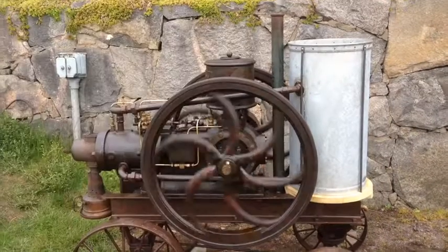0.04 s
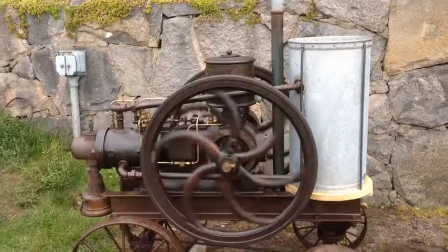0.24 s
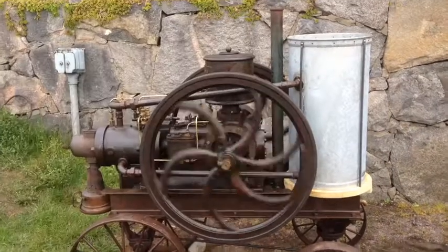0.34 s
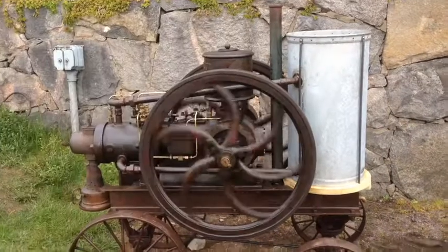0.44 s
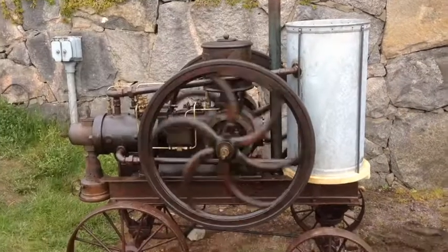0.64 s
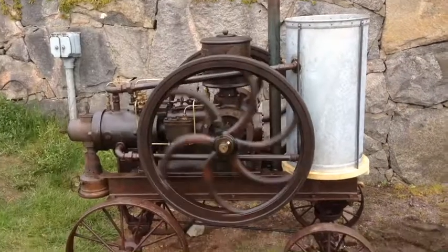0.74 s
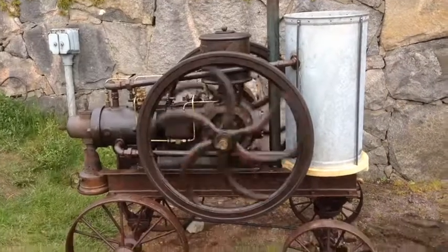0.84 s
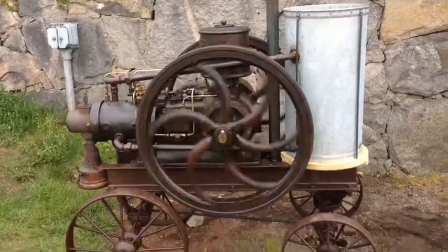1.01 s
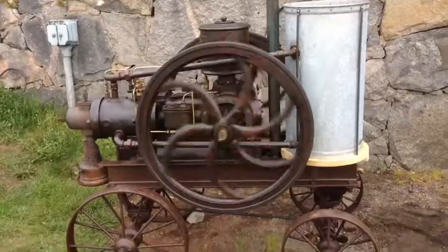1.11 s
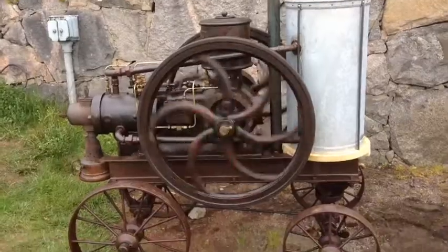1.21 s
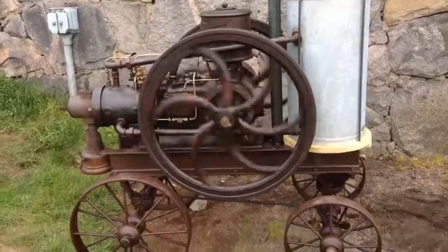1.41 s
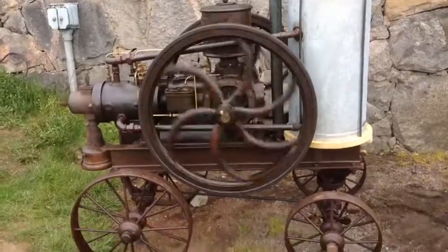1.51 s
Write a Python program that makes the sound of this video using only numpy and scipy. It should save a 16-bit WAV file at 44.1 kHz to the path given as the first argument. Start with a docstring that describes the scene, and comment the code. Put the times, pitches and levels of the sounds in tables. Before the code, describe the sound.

An old engine runs with rhythmic puffs, metal clacks and irregular booming exhaust firings.

```python
"""A chugging, clacking beat, about four to the second: an old single-cylinder two-stroke engine outdoors.
It fires on only some turns. A firing booms and hisses out of the exhaust stack; an unfired turn only puffs.
Each turn it gulps air (a thump, a fluttering valve, a hiss), its linkage clacks and its exhaust port
opens with a crack. The iron frame rumbles underneath, and a stone wall throws back a short scatter."""
import sys
import numpy as np
from scipy import signal
from scipy.fft import rfft, irfft
from scipy.io import wavfile
from scipy.ndimage import uniform_filter1d

SR = 44100
rng = np.random.default_rng(int(sys.argv[2]) if len(sys.argv) > 2 else 0)


def int16_out(signal):
    """Quantize to a 16-bit WAV file."""
    q = np.round(np.clip(np.atleast_2d(signal).T, -1, 1) * 32767)
    wavfile.write(sys.argv[1], SR, q.astype(np.int16))


N = 68355


def undb(db):
    """Decibels to gain."""
    return 10 ** (np.asarray(db) / 20)


def unit(x):
    """Scale to rms 1."""
    return x / np.sqrt(np.mean(x ** 2) + 1e-18)


def since(start_s):
    """Seconds since a moment, negative before it."""
    return np.arange(N) / SR - start_s


def swell(t, rise_s, fall_s, hold_s=0):
    """Envelope: exponential rise up to t = 0, a hold, exponential fall."""
    return np.exp(np.minimum(t, 0) / rise_s - np.maximum(t - hold_s, 0) / fall_s)


def noise(colour):
    """Noise shaped by an EQ curve of (pitch_hz, level_db) points."""
    hz, db = np.array(colour).T
    f = np.arange(N // 2 + 1) * SR / N + 1
    curve = undb(np.interp(np.log(f), np.log(hz), db))
    return unit(irfft(rfft(rng.standard_normal(N)) * curve, N))


def resonant_noise(peaks):
    """Noise through steep parallel resonances of (pitch_hz, width_hz, level_db)."""
    f = np.arange(N // 2 + 1) * SR / N
    response = sum(undb(db) / (1 + 1j * (f - hz) / width) ** 2 for hz, width, db in peaks)
    return unit(irfft(rfft(rng.standard_normal(N)) * response, N))


def wander(rate_hz):
    """Smooth random modulation with rms 1."""
    step = max(int(SR / rate_hz), 2)
    stairs = np.repeat(rng.standard_normal(N // step + 1), step)
    return unit(uniform_filter1d(stairs, step)[:N])


def phase_of(t, pitch_hz):
    """Phase of a tone of moving pitch, zero at t = 0."""
    phase = 2 * np.pi * np.cumsum(pitch_hz) / SR
    return phase - np.interp(0, t, phase)


# EQ of the steady low bed: pitch_hz, level_db
BED_COLOUR = [(20, -27), (40, 9), (90, -4), (160, 5.5), (300, 0), (600, -10), (1400, -22.5), (11000, -19),
              (15500, -30)]
# resonances of the iron frame: pitch_hz, width_hz, level_db
FRAME_PEAKS = [(127.4, 19, 1.5), (167.3, 30.7, 8.5), (215.8, 11, 1.5), (373.3, 22.2, -1.5),
               (486.5, 28.5, -4), (726, 61, -14.5), (848, 72, -18.5)]


def frame_rumble():
    """The iron frame rumbles unevenly over a steady bed of low noise."""
    rumble = resonant_noise(FRAME_PEAKS) * undb(2.5 * wander(rate_hz=20))
    return undb(-45) * rumble + undb(-50.5) * noise(BED_COLOUR)


def frame_shake():
    """The shaken frame sounds its upper resonances."""
    return resonant_noise(FRAME_PEAKS[3:])


def wall_scatter(engine):
    """The stone wall behind the engine returns a short, diffuse slap."""
    colour = noise([(100, -50), (800, 14.5), (4000, 10.0), (15000, -20)])
    scatter = colour * swell(since(0.017), rise_s=0.002, fall_s=0.026)
    return signal.fftconvolve(engine, scatter / np.sqrt(np.sum(scatter ** 2)))[:N]


# dull resonances of the linkage: pitch_hz, width_hz, level_db
KNOCK_PEAKS = [(1798, 100, 3.5), (2220, 210, 1)]
# bright resonances of the rod: pitch_hz, width_hz, level_db
ROD_PEAKS = [(2900, 150, 0), (5200, 600, -21)]
# linkage hits: start_s, knock_db, rod_db
CLACK_HITS = [(.002, -47, -53), (.168, -56, -60), (0.416, -48, -52), (0.654, -46, -41), (0.891, -44, -37.5),
              (1.11, -46, -53), (1.351, -44.5, -35.5)]


def linkage_clacks():
    """Rods knock, ring and set the iron singing on one faint, wavering, sagging note."""
    out, knock, rod = 0, resonant_noise(KNOCK_PEAKS), resonant_noise(ROD_PEAKS)
    rise_s, iron_hz, sag_hz_per_s = 0.0021, 1053, 304
    for start_s, knock_db, rod_db in CLACK_HITS:
        t = since(start_s + 0.00178)
        out += undb(knock_db) * knock * swell(t, rise_s, fall_s=0.012)
        out += undb(rod_db) * rod * swell(t, rise_s, fall_s=0.0059)
        pitch_hz = iron_hz * (1 + 0.012 * wander(rate_hz=80)) - sag_hz_per_s * t
        note = swell(t, rise_s, hold_s=0.035, fall_s=0.046) * np.sin(phase_of(t, pitch_hz))
        out += undb(-53.5 + 2 * wander(rate_hz=60.2)) * note
    return out


# EQ of a tick: pitch_hz, level_db
TICK_COLOUR = [(1500, -4), (4500, 4), (7000, 2.5), (10000, 7.5), (12500, 5.5), (15500, -12)]
# cracks of the exhaust port opening, and other light ticks: start_s, level_db
TICK_HITS = [(.047, -48), (0.095, -40), (0.135, -51), (0.2892, -43.5), (0.296, -50), (0.528, -51),
             (0.535, -44.5), (0.767, -53.5), (0.813, -38.5), (.891, -49.5), (1.007, -45.5), (1.032, -39),
             (1.072, -49.5), (1.2255, -42), (1.231, -41.5), (1.463, -50), (1.512, -39)]
# thin metal clinks: start_s, level_db
CLINK_HITS = [(0.094, -40.5), (0.815, -45), (1.51, -53)]


def ticks_and_clinks():
    """Sharp cracks as the exhaust port opens, with other light ticks and metal clinks."""
    out, bright = 0, noise(TICK_COLOUR)
    metal = resonant_noise([(4910, 360, 0)])
    grain = unit(bright * undb(4.5 * wander(rate_hz=450)))
    for start_s, level_db in TICK_HITS:
        t = since(start_s)
        snap = undb(-2) * bright * swell(t, rise_s=0.00023, fall_s=0.0055)
        tail = undb(-9) * grain * swell(t, rise_s=0.00078, fall_s=0.032)
        out += undb(level_db) * (snap + tail)
    for start_s, level_db in CLINK_HITS:
        out += undb(level_db) * metal * swell(since(start_s), rise_s=0.0052, fall_s=0.0099)
    return out


# short hoots between gulps: start_s, level_db
HOOT_CUES = [(0.12, -39), (0.349, -36), (1.055, -39), (1.495, -43.5)]


def hoots(hoot_hz=496.3):
    """Short, breathy hoots come between the gulps and hum on in the stack's lowest mode."""
    out, hum_hz = 0, STACK_MODES[0][0]
    churn = noise([(150, -14.5), (400, 5.5), (800, -7.5), (2500, -14.5), (6000, -24.5)])
    for start_s, level_db in HOOT_CUES:
        t = since(start_s)
        pitch_hz = hoot_hz * (1 + 0.03 * wander(rate_hz=250))
        hoot = swell(t, rise_s=0.0064, hold_s=0.009, fall_s=0.013) * np.sin(phase_of(t, pitch_hz))
        hum = swell(t - 0.029, rise_s=0.022, fall_s=0.017) * np.sin(2 * np.pi * hum_hz * t)
        breath = swell(t, rise_s=0.012, hold_s=0.023, fall_s=0.021) * churn
        out += undb(level_db) * (hoot + undb(2) * hum + undb(-7) * breath)
    return out


def air_shove(t, pitch_hz=52.5):
    """One deep shove of air, peaking at t = 0."""
    return swell(t, rise_s=0.0065, fall_s=0.0052) * np.cos(2 * np.pi * pitch_hz * t)


def rising_thump(t, centre_hz, rise_s, fall_s):
    """A low note of gulped air, gliding up through its centre pitch as it peaks."""
    pitch_hz = centre_hz + 25.6 * np.tanh(t / 0.031)
    return swell(t, rise_s, fall_s) * np.cos(phase_of(t, pitch_hz))


def valve_flutter(t, centre_hz=482.6, open_s=0.024):
    """The air valve flutters on an unsteady note that lifts slightly as it opens."""
    opening = np.clip(t / open_s, 0, 1)
    pitch_hz = centre_hz * (1 + 0.022 * (opening - 0.5) + 0.03 * wander(rate_hz=250))
    return swell(t, rise_s=0.0046, hold_s=open_s, fall_s=0.0058) * np.sin(phase_of(t, pitch_hz))


# EQ of the intake hiss: pitch_hz, level_db
AIR_COLOUR = [(300, -28), (800, 9.5), (1300, 1.5), (2200, 1.5), (3300, 6.5), (6000, 5.5), (10300, 10),
              (12000, 5.5), (14000, -4.5), (15500, -8)]
# gulps of air: start_s, thump_db, flutter_db, hiss_db
INTAKE_CUES = [(.196, -31, -32, -35), (0.437, -28.5, -36, -35.5), (0.674, -29, -35, -36),
               (0.916, -29, -38, -34.5), (1.133, -28.5, -43.5, -34), (1.372, -31, -37.5, -36)]


def intake():
    """The crankcase gulps: a low thump sways on, the valve flutters and hisses, the frame shakes."""
    out, air, body = 0, noise(AIR_COLOUR), frame_shake()
    for start_s, thump_db, flutter_db, hiss_db in INTAKE_CUES:
        t = since(start_s)
        thump = rising_thump(t, centre_hz=132.9, rise_s=0.0062, fall_s=0.015)
        sway = rising_thump(t - 0.0737, centre_hz=127, rise_s=0.027, fall_s=0.074)
        shoves = air_shove(t) + undb(-9) * air_shove(t - 0.055)
        hiss = swell(t - 0.009, rise_s=0.0048, hold_s=0.0083, fall_s=0.013) * air
        shake = swell(t - 0.009, rise_s=0.0048, hold_s=0.0083, fall_s=0.02) * body
        out += undb(thump_db) * (thump + undb(-4.5) * shoves + undb(-11) * sway)
        out += undb(flutter_db) * valve_flutter(t - 0.019)
        out += undb(hiss_db) * (hiss + undb(-4.5) * shake)
    return out


# unfired turns: start_s, level_db
PUFF_CUES = [(0.072, -35.5), (0.804, -32), (1.024, -43.5), (1.503, -31.5)]


def unfired_puffs(puff_hz=179.3):
    """Without a firing the piston only pushes a soft note through the stack and shakes the frame."""
    out, body = 0, frame_shake()
    for start_s, level_db in PUFF_CUES:
        t = since(start_s)
        phase = phase_of(t, puff_hz * (1 + 0.05 * wander(rate_hz=90)))
        puff = swell(t, rise_s=0.022, fall_s=0.017) * (np.cos(phase) + undb(-18.5) * np.cos(2 * phase))
        shake = swell(t, rise_s=0.069, fall_s=0.057) * body
        out += undb(level_db) * (puff + undb(-14) * shake)
    return out


# ringing modes of the exhaust stack: pitch_hz, level_db, t60_s
STACK_MODES = [(183.6, 1.5, 0.26), (208.8, -12.5, 0.56), (386.8, -7.5, 0.28), (443.6, -15.5, 0.33),
               (620, -19, 0.075), (690, -53, 0.15), (898, -22.5, 0.36), (1123.5, -27.5, 0.5)]


def stack_ring(t):
    """The stack, struck at t = 0, rings out, tuned a little differently each time."""
    out, t = 0, np.maximum(t, 0)
    for pitch_hz, level_db, t60_s in STACK_MODES:
        detune = 1 + 0.004 * rng.standard_normal()
        out += undb(level_db - 60 * t / t60_s) * np.sin(2 * np.pi * pitch_hz * detune * t)
    return out


# EQ of the exhaust hiss: pitch_hz, level_db
GAS_COLOUR = [(300, -8.5), (900, -19.5), (1350, -24.5), (2200, -12.5), (3500, -8), (5200, -0.5),
              (7000, -4.5), (8400, -5), (10100, 1), (11500, -2), (13000, -9.5), (15500, -16)]
# bright resonances of the gas in the stack: pitch_hz, level_db
PIPE_PEAKS = [(1790, 7), (1995, 7.5), (2412, 6.5), (2920, 9.5), (3290, 12), (4170, 8), (5250, 15),
              (5415, 5), (5655, 10), (6710, 10.5), (7065, 14), (8770, 7), (9850, 18.5), (10400, 14)]
# hollow resonances of the stack: pitch_hz, width_hz, level_db
BARK_PEAKS = [(247, 21.4, 14.5), (680, 49.5, 2), (913, 32, 1.5)]
# firings: peak_s, boom_db, hiss_db, resonance_db
FIRING_CUES = [(0.317, -24.5, -27, -43), (0.557, -22, -23.5, -24), (1.253, -25, -25.5, -26.5)]


def exhaust_firings():
    """Each firing thuds and booms; gas hisses, the stack barks and rings, and a small puff follows."""
    out, gas = 0, noise(GAS_COLOUR)
    pipe = resonant_noise([(hz, 55, db) for hz, db in PIPE_PEAKS])
    bark = resonant_noise(BARK_PEAKS)
    for peak_s, boom_db, hiss_db, resonance_db in FIRING_CUES:
        t = since(peak_s)
        early = t + 0.0072  # the low end leads the hiss
        flow = swell(early, rise_s=0.012, hold_s=0.02, fall_s=0.002)
        pitch_hz = 174 + flow * (28 - 25 * np.tanh(t / 0.00315 - 1))  # sags as the pressure drops
        phase = phase_of(t, pitch_hz)
        boom = flow * (np.cos(phase) + undb(-14) * np.cos(2 * phase))
        out += undb(boom_db) * (boom + undb(-19) * air_shove(early) + undb(-2) * stack_ring(t - 0.00297))
        afterpuff = swell(t - 0.0534, rise_s=0.00086, fall_s=0.013)
        gas_env = swell(t, rise_s=0.0034, hold_s=0.001, fall_s=0.021) + undb(-14) * afterpuff
        pipe_env = swell(t, rise_s=0.0034, hold_s=0.001, fall_s=0.015) + undb(-17.5) * afterpuff
        bark_env = swell(early, rise_s=0.0034, hold_s=0.02, fall_s=0.012)
        throb = 1 + 0.17 * flow * np.cos(phase)  # the hiss pulses with the boom
        out += undb(hiss_db) * gas_env * gas * throb
        out += undb(resonance_db) * (pipe_env * pipe + undb(-5) * bark_env * bark)
    return out


def scene():
    """The engine in mono, with its slap off the wall and the rumble underneath."""
    engine = exhaust_firings() + unfired_puffs() + intake() + hoots()
    engine += ticks_and_clinks() + linkage_clacks()
    return (engine + undb(-15.5) * wall_scatter(engine) + frame_rumble())[None]


def record(dry):
    """Master EQ: thin the deepest bass and cut the top steeply."""
    low_cut = signal.butter(2, 28, "high", fs=SR, output="sos")
    high_cut = signal.ellip(10, 0.2, 80, 15400, fs=SR, output="sos")
    return signal.sosfilt(high_cut, signal.sosfilt(low_cut, dry))


dry = scene()
out = record(dry)
int16_out(out)
```